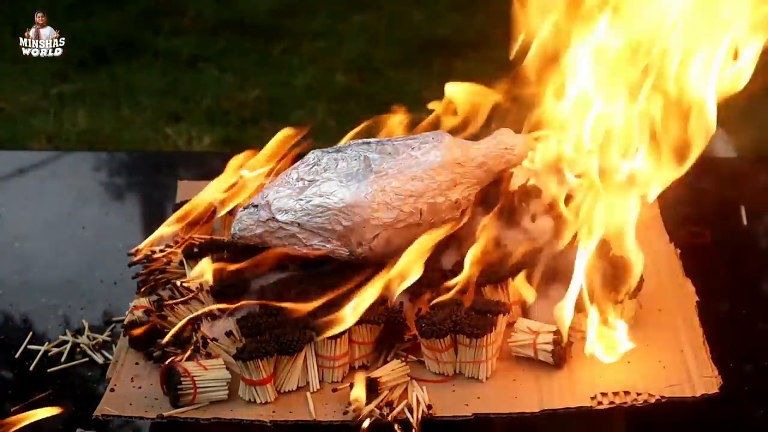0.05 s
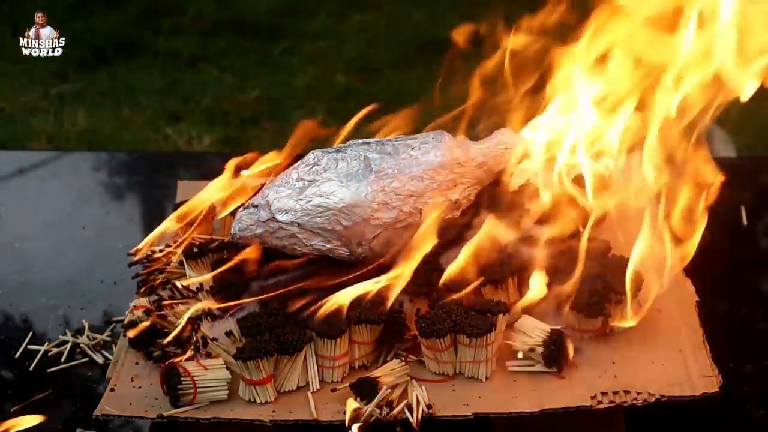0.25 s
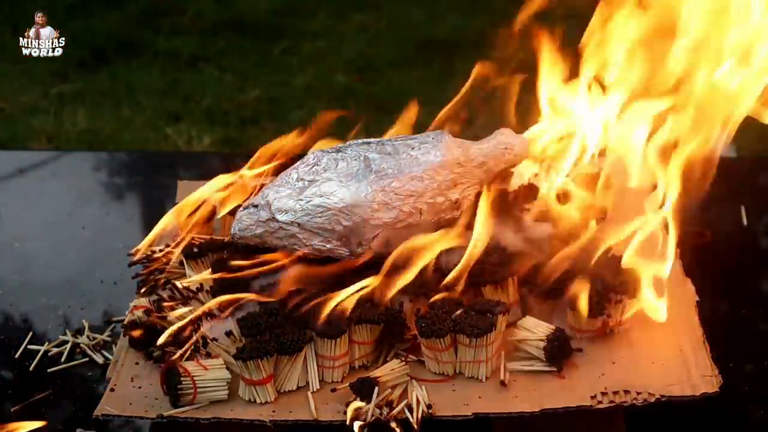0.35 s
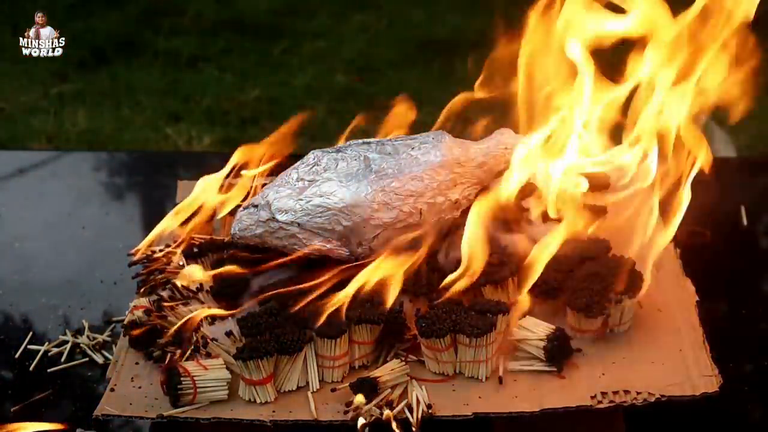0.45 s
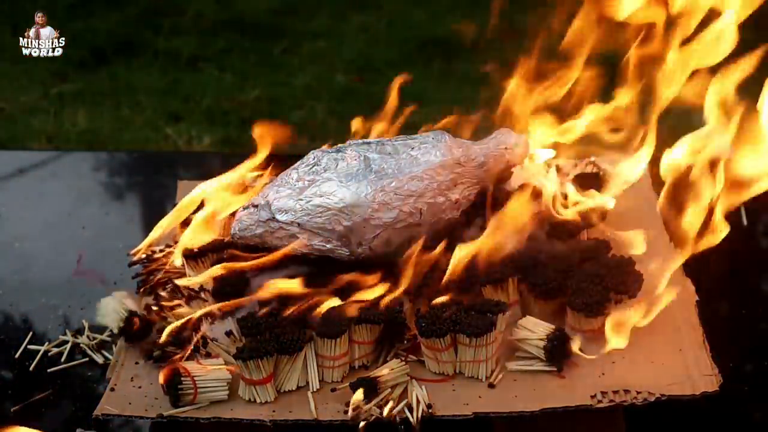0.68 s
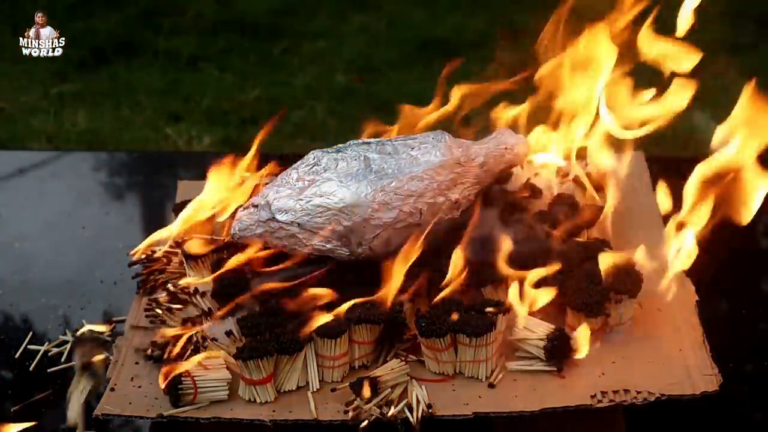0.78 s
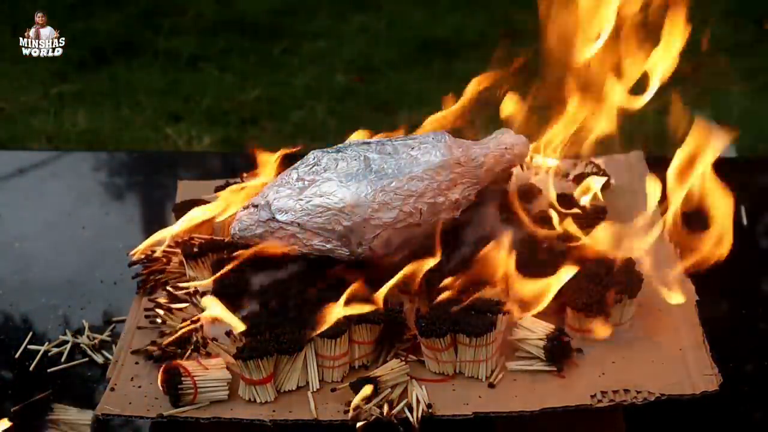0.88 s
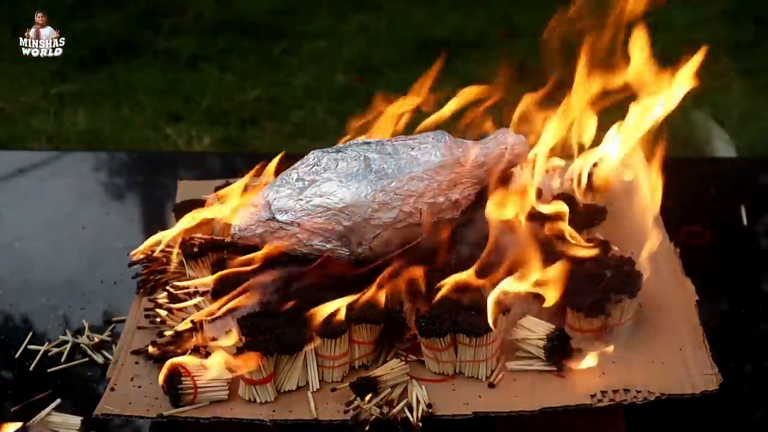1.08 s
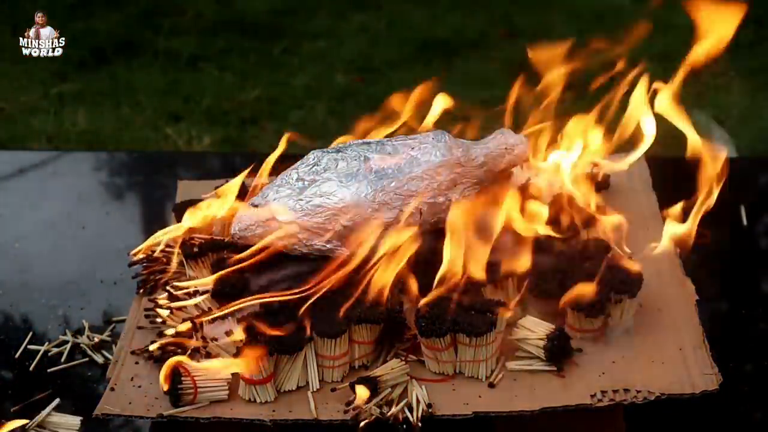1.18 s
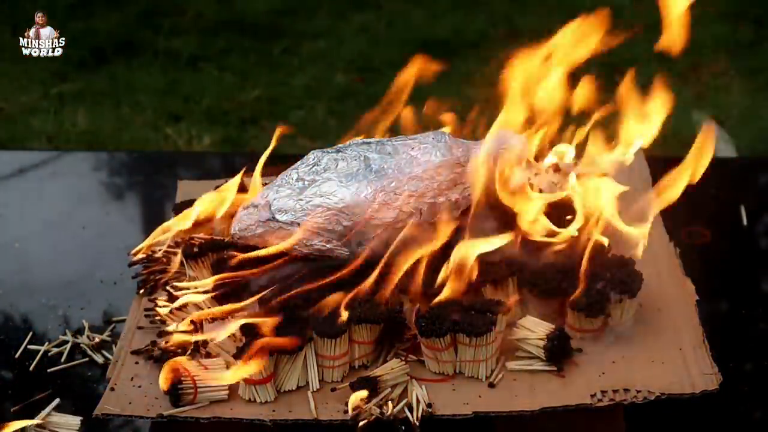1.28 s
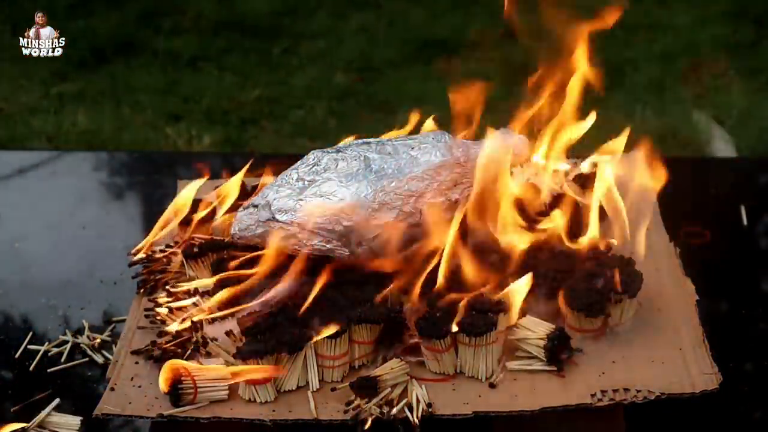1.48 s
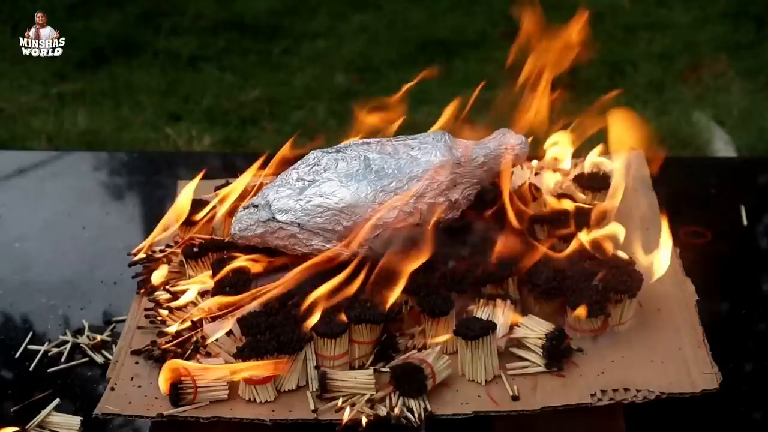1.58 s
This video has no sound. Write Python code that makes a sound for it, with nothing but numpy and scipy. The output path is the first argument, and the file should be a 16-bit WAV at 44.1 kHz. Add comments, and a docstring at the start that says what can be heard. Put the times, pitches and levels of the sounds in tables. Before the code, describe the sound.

Burning matches crackle and snap sharply over a soft rush of flames.

```python
"""Bundles of matches burning on cardboard, close to the microphone, outdoors in a yard.
Sticks snap and tick over the soft roar of the flames, heads flare in short hisses of gas,
and one head bursts loudly enough to overload the microphone. The yard returns a faint echo
of the cracks; behind the fire lie a low outdoor rumble and the hum of a distant machine."""
import sys
import numpy as np
from scipy import signal
from scipy.fft import rfft, irfft
from scipy.io import wavfile
from scipy.ndimage import uniform_filter1d

SR = 44100
rng = np.random.default_rng(int(sys.argv[2]) if len(sys.argv) > 2 else 0)


def put_to_file(sound):
    """Save the sound as 16-bit audio at rate SR, in the file named by the first command-line argument."""
    columns = np.atleast_2d(sound).T  # one column per channel
    safe = np.clip(columns, -1, 1)
    whole_steps = np.round(safe * 32767)
    wavfile.write(sys.argv[1], SR, whole_steps.astype(np.int16))


N = 72765
T = np.arange(N) / SR
HZ = np.fft.rfftfreq(N, 1 / SR)


def amp(db):
    """Decibels to gain."""
    return 10 ** (np.asarray(db) / 20)


def unit(x):
    """Scales to an rms of one."""
    return x / np.sqrt(np.mean(x ** 2) + 1e-20)


def colour(points, hz=HZ):
    """Gain of a spectrum given as (Hz, dB) points on a log-frequency axis."""
    f, db = np.transpose(points)
    return amp(np.interp(np.log(hz + 1), np.log(f), db))


def noise(gain):
    """Noise with the given spectrum and an rms of one."""
    return unit(irfft(rfft(rng.standard_normal(N)) * gain, N))


def hump(centre_hz, octaves):
    """A bell-shaped spectrum."""
    return np.exp(-.25 * (np.log2((HZ + 1) / centre_hz) / octaves) ** 2)


def drift(rate_hz):
    """Random wander, mostly slower than the given rate."""
    return noise(1 / (1 + (HZ / rate_hz) ** 2) ** 2)


def add(mix, start_s, sound):
    """Mixes a sound in at a time."""
    part = mix[max(0, round(start_s * SR)):][:len(sound)]
    part += sound[:len(part)]


def resonance(hz, centre_hz, width_hz):
    """Gain of one resonance, one at its centre."""
    return 1 / (1 + (2 * (hz - centre_hz) / width_hz) ** 2)


def crack(envelope, passes):
    """A random rush under a brief envelope, evened out towards a flat spectrum."""
    x = envelope * rng.standard_normal(len(envelope))
    for _ in range(passes):
        x = irfft(np.exp(1j * np.angle(rfft(x))))
        local_rms = np.sqrt(abs(uniform_filter1d(x ** 2, size=24, mode="wrap")) + 1e-12)
        x = x * envelope / local_rms
    return x / np.linalg.norm(x)


def ring_through(x, gain):
    """Colours a sound with a minimum-phase filter, so that resonances ring on after it."""
    cepstrum = irfft(np.log(np.maximum(gain, 1e-5)))
    cepstrum[1:len(x) // 2] *= 2
    cepstrum[len(x) // 2 + 1:] = 0
    return irfft(rfft(x) * np.exp(rfft(cepstrum)))


def background(air_db=-53, hum_db=-59, hum_hz=93, waver_hz=3.9):
    """Low outdoor rumble, faint hiss and the wavering hum of a distant machine."""
    # The open air. Each row: frequency in Hz, relative level in dB.
    air = [(15, -6.5), (30, -8.5), (55, 2), (100, -3), (140, -1.5), (220, -3), (330, -8), (600, -17),
           (1500, -27.5), (3000, -33), (6500, -32), (9800, -30.5), (12500, -39.5), (16000, -48.5)]
    turns = np.cumsum(hum_hz + waver_hz * drift(rate_hz=11)) / SR
    return amp(air_db) * noise(colour(air)) + amp(hum_db) * unit(np.sin(2 * np.pi * turns))


def yard_echo(x, level_db=-21.5, rise_s=.0033, t60_s=.18):
    """Weak reflections scatter back to the microphone from around the yard."""
    # Colour of the echo. Each row: frequency in Hz, relative level in dB.
    echo = [(60, -11), (250, -18), (480, 9), (800, -4.5), (1200, 6.5), (1600, -3.5), (2800, -7.5),
            (3700, 0), (7000, 2.5), (10000, -14), (16000, -7.5)]
    tail = noise(colour(echo)) * np.minimum(T / rise_s, 1) * np.exp(-np.log(1000) * T / t60_s)
    return amp(level_db) * signal.fftconvolve(x, tail / np.linalg.norm(tail))[:N]


def whistle(pitch_hz=2756, width_hz=130):
    """Gas escapes from a stick with a faint, narrow, unsteady tone."""
    # Course of the whistle. Each row: time in seconds, level in dB.
    swell = [(1.15, -77.5), (1.4, -68), (1.55, -67), (1.575, -56), (1.65, -58)]
    return amp(np.interp(T, *np.transpose(swell))) * noise(resonance(HZ, pitch_hz, width_hz))


def thin_ring(start_s=.948, t60_s=.26):
    """A few faint partials ring out after one flare."""
    # Partials of the ring. Each row: frequency in Hz, relative level in dB.
    partials = [(1405, -59.5), (1518, -52), (2094, -58), (2810, -56), (4113, -61), (8242, -61)]
    t = np.maximum(T - start_s, 0)
    tones = sum(2 * amp(db) * np.sin(2 * np.pi * hz * t) for hz, db in partials)
    return np.exp(-np.log(1000) * t / t60_s) * tones


def puffs(centre_hz=170):
    """Tongues of flame flap with a soft low thud."""
    # Flaps of flame. Each row: time of the peak in seconds, width in seconds, level in dB.
    flaps = [(.075, 0.011, -51.5), (0.216, 0.012, -52), (0.673, 0.019, -47), (0.851, 0.0095, -43),
             (0.894, 0.0072, -45), (.93, 0.0086, -49.5), (1.235, 0.011, -49.5), (1.628, 0.012, -52)]
    envelope = sum(amp(db) * np.exp(-.5 * ((T - peak) / width) ** 2) for peak, width, db in flaps)
    return noise(hump(centre_hz, octaves=.51)) * envelope


def roar(flicker_db=1.0, patch_db=1.2):
    """Turbulent flames: noise that flickers as a whole and in patches of time and frequency."""
    # Colour of the roar. Each row: frequency in Hz, relative level in dB.
    spectrum = [(60, -7.5), (250, -6), (500, 0.5), (800, -2), (1600, -1.5), (2500, -9), (4300, -10),
                (6200, -20.5), (9500, -16), (12500, -22.5), (16000, -39.5)]
    _, _, cells = signal.stft(rng.standard_normal(N), SR, nperseg=256)
    patches = uniform_filter1d(rng.standard_normal(cells.shape), size=6, axis=0)
    patches = unit(uniform_filter1d(patches, size=10, axis=1))
    rush = signal.istft(cells * amp(patch_db * patches), SR, nperseg=256)[1][:N]
    rush = irfft(rfft(rush) * colour(spectrum), N)
    return unit(rush * amp(flicker_db * drift(rate_hz=60)))


def ticks(per_second=200, pitches=12, spread_db=4, fall_s=.0005):
    """Tiny cracks in the charring wood, each a damped ping at one of several pitches."""
    out, t = np.zeros(N), np.arange(400) / SR
    for hz in np.geomspace(1000, 7000, pitches):
        onsets = rng.random(N) < per_second / pitches / SR
        strength = amp(spread_db * np.minimum(rng.exponential(1, N), 2))
        ping = np.exp(-t / fall_s) * np.sin(2 * np.pi * hz * t)
        out += signal.oaconvolve(onsets * strength, ping)[:N] / np.sqrt(hz)
    return unit(out)


def flames(ticks_re_roar_db=-9):
    """The roar and the ticking wood swell and sink together as the fire burns."""
    # Strength of the blaze. Each row: time in seconds, level of the roar in dB.
    blaze = [(0, -47), (.2, -53.5), (.4, -54.5), (.46, -53.5), (.6, -51.5), (.81, -50), (.92, -53),
             (1.04, -56.5), (1.27, -56), (1.36, -60), (1.52, -59), (1.65, -62.5)]
    return amp(np.interp(T, *np.transpose(blaze))) * (roar() + amp(ticks_re_roar_db) * ticks())


def flares(flutter_db=1.3):
    """Match heads catch: jets of gas swell, hold and die away."""
    # Flaring heads. Each row: start, rise, hold and fade in seconds, level in dB,
    # centre in Hz, width in octaves.
    heads = [(0.045, 0.022, 0.043, .02, -56, 8400, 0.17), (0.02, 0.022, 0.041, 0.028, -50.5, 1760, 0.46),
             (.24, .018, 0.021, 0.079, -42, 4800, .4), (0.493, 0.0091, 0.16, 0.095, -51.5, 1290, 0.68),
             (.74, .005, 0.051, 0.027, -58.5, 1900, 0.93), (.943, .004, .005, .011, -47.5, 10500, .2),
             (0.9005, 0.047, 0.0066, 0.037, -48.5, 2140, 0.81), (1.083, 0.012, .02, 0.039, -57, 1720, 0.28),
             (1.565, 0.0044, 0.061, 0.046, -49.5, 1700, 0.85), (1.564, 0.0027, 0.055, 0.03, -48, 400, 0.55),
             (1.57, 0.0093, 0.06, .03, -49, 900, 0.14), (1.615, 0.03, .02, .03, -46.5, 1240, .4)]
    out = np.zeros(N)
    for start, rise, hold, fade, db, hz, octaves in heads:
        swell = np.clip((T - start) / rise, 0, 1)
        decay = np.exp(-np.maximum(T - start - rise - hold, 0) / fade)
        out += amp(db) * swell * decay * noise(hump(hz, octaves))
    return out * amp(flutter_db * drift(rate_hz=80))


def snaps(rise_s=.0003, fall_share=.43, ring_q=5, ripple_db=3, size=2048):
    """Sticks break: a few milliseconds of splintering, coloured by the wood and its main resonance."""
    # Snapping sticks. Each row: start and length in seconds, ring pitch in Hz, ring height in dB,
    # then the band levels of thud, knock, body, crack, sizzle and air in dB.
    fractures = [(0.0192, 0.005, 4130, 3, -49, -43, -40, -37, -40, -43),
                 (0.2058, 0.002, 4200, 3, -56, -57, -52, -51, -55, -61),
                 (0.3145, 0.005, 780, 6, -50, -39, -36, -37, -44, -60),
                 (0.3302, 0.003, 2970, 8, -59, -56, -41, -36, -53, -71),
                 (0.3505, 0.003, 3100, 7, -53, -43, -39, -35, -47, -72),
                 (0.3642, 0.002, 2890, 3, -54, -54, -53, -46, -52, -62),
                 (0.3862, 0.003, 3270, 4, -63, -51, -45, -42, -59, -74),
                 (0.4312, 0.003, 1650, 5, -49, -44, -32, -37, -48, -54),
                 (0.5935, 0.002, 1510, 3, -53, -48, -43, -49, -54, -64),
                 (0.627, 0.002, 1550, 3, -56, -46, -44, -49, -66, -74),
                 (0.7224, 0.0015, 4300, 4, -58, -45, -38, -31, -26, -33),
                 (0.7238, 0.005, 1080, 8, -41, -29, -31, -29, -27, -38),
                 (0.7303, 0.004, 3700, 7, -37, -38, -40, -30, -36, -48),
                 (0.7372, 0.0013, 3600, 6, -39, -40, -42, -26, -29, -40),
                 (0.7405, 0.003, 2970, 6, -43, -44, -43, -35, -42, -56),
                 (0.7697, 0.003, 3900, 10, -51, -46, -56, -41, -61, -72),
                 (0.7815, 0.003, 3800, 5, -58, -55, -46, -42, -50, -61),
                 (0.7865, 0.003, 7320, 3, -58, -52, -52, -46, -47, -63),
                 (0.84, 0.003, 3920, 5, -52, -50, -51, -50, -60, -67),
                 (0.8908, 0.003, 4310, 4, -52, -51, -50, -44, -53, -66),
                 (0.9226, 0.003, 3490, 4, -47, -54, -48, -42, -48, -65),
                 (0.933, 0.003, 1550, 3, -60, -56, -51, -57, -55, -56),
                 (1.2735, 0.003, 7970, 4, -57, -65, -57, -56, -53, -70),
                 (1.3178, 0.003, 1680, 5, -65, -57, -51, -56, -64, -81),
                 (1.5352, 0.003, 4480, 4, -63, -56, -52, -53, -57, -67),
                 (1.552, 0.002, 2750, 6, -60, -62, -61, -56, -54, -73),
                 (1.5623, 0.003, 4200, 2, -62, -53, -45, -41, -34, -39),
                 (1.565, 0.003, 2950, 12, -40, -46, -39, -29, -34, -44),
                 (1.5683, 0.004, 4450, 8, -40, -52, -46, -37, -37, -47),
                 (1.5725, 0.005, 990, 4, -45, -42, -45, -41, -43, -50),
                 (1.579, 0.005, 430, 4, -38, -42, -45, -44, -54, -64),
                 (1.6132, 0.003, 1720, 5, -43, -47, -38, -44, -51, -62),
                 (1.6348, 0.004, 2950, 7, -56, -52, -52, -43, -55, -63),
                 (1.6482, 0.002, 950, 5, -40, -34, -37, -48, -49, -59)]
    # Those six bands. Each row: lower and upper edge in Hz.
    bands = [(250, 700), (700, 1300), (1300, 2500), (2500, 5000), (5000, 11000), (11000, 16000)]
    # Colour within the bands. Each row: frequency in Hz, relative level in dB.
    wood = [(60, -22), (250, -8), (450, 0), (3500, 0), (4800, -6), (6300, -11), (9500, -6.5),
            (12000, -10.5), (16000, -25)]
    out, t, hz = np.zeros(N), np.arange(size) / SR, np.fft.rfftfreq(size, 1 / SR)
    centres = np.sqrt(np.prod(bands, axis=1))
    for start, length, pitch, ring_db, *levels in fractures:
        ring = 1 + (amp(ring_db) - 1) * resonance(hz, pitch, pitch / ring_q)
        ripple = unit(uniform_filter1d(rng.standard_normal(len(hz)), size=16))
        gain = colour(wood, hz) * ring * amp(ripple_db * ripple)
        for _ in range(4):  # bend the colour smoothly to the level of each band
            power = np.array([np.mean(gain ** 2 * ((hz >= low) & (hz < high))) for low, high in bands])
            gain = gain * colour(list(zip(centres, levels - 10 * np.log10(power))), hz)
        envelope = (1 - np.exp(-t / rise_s)) * np.exp(-t / (length * fall_share))
        splinters = crack(envelope, passes=2)
        add(out, start, np.sqrt(length * SR) * ring_through(splinters, gain))
    return out


def burst(start_s=.232, gas_db=-1.2, hold_s=.0024, fall_s=.0005, push_db=-7, push_s=.001, size=4096):
    """A match head explodes: the expanding gas gives a low push and a blast that rings the bundle."""
    # Colour of the blast. Each row: frequency in Hz, relative level in dB.
    blast = [(30, -24), (200, -22), (300, -20), (650, -22), (1150, -15), (1450, -7), (1900, -13),
             (2400, -7), (3000, -13), (4700, -7.5), (5600, -7.5), (6600, -16), (7500, -11), (11000, -11.5),
             (15000, -19), (17000, -34)]
    # Resonances of the bundle. Each row: frequency in Hz, width in Hz, relative level in dB.
    bundle = [(450, 130, -8.5), (745, 120, -12), (1025, 140, -6), (1400, 200, -9), (1674, 240, -2),
              (2178, 260, -2), (2670, 280, 0), (3225, 280, 3), (3736, 280, -1), (4228, 300, -1),
              (7916, 450, -2), (8600, 350, -7), (9644, 600, -1.5)]
    out, t, hz = np.zeros(N), np.arange(size) / SR, np.fft.rfftfreq(size, 1 / SR)
    bundle_power = sum((amp(db) * resonance(hz, centre, width)) ** 2 for centre, width, db in bundle)
    gain = unit(np.sqrt(colour(blast, hz) ** 2 + bundle_power))
    envelope = np.exp(-np.maximum(t - hold_s, 0) / fall_s)
    gas = np.sqrt(hold_s * SR) * ring_through(crack(envelope, passes=12), gain)
    push = (1 - t / push_s) * np.exp(-t / push_s)
    add(out, start_s, amp(gas_db) * gas + amp(push_db) * push)
    return out


def scene():
    """Close cracks and their echo over the fire and the outdoor background, in mono."""
    cracks = snaps() + burst()
    mix = cracks + flames() + yard_echo(cracks)
    return (mix + flares() + puffs() + thin_ring() + whistle() + background())[None]


def record(dry):
    """The close microphone clips on the burst; the treble is then cut above 16 kHz."""
    clipped = np.clip(dry, -1, 1)
    lowpass = signal.firwin(255, 16000, window=("kaiser", 9), fs=SR)
    return signal.oaconvolve(clipped, lowpass[None], "same")


dry = scene()
out = record(dry)
put_to_file(out)
```